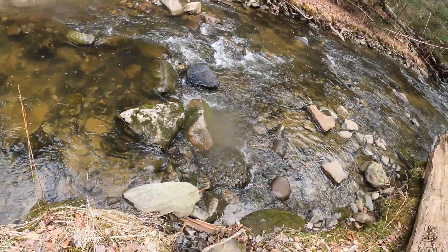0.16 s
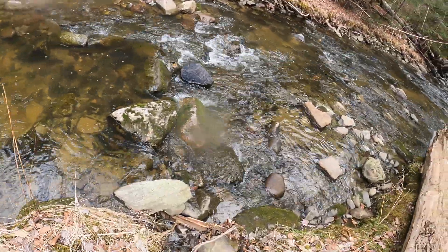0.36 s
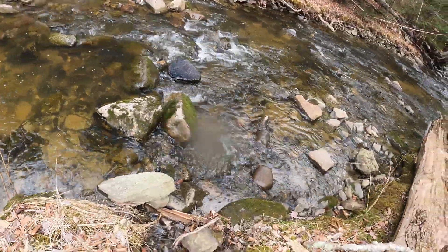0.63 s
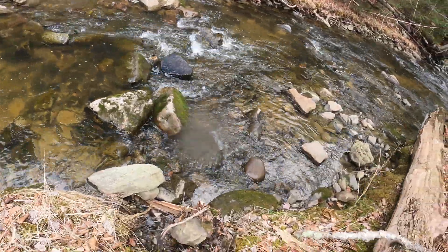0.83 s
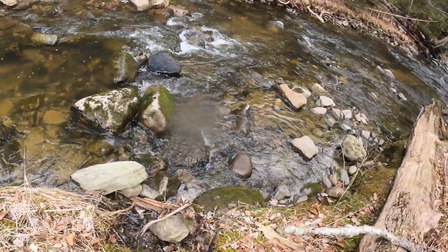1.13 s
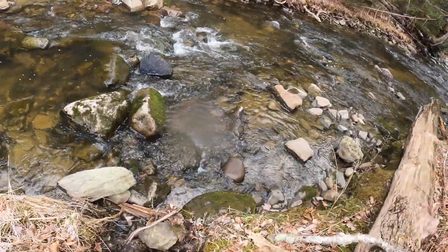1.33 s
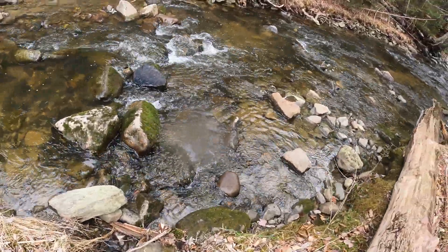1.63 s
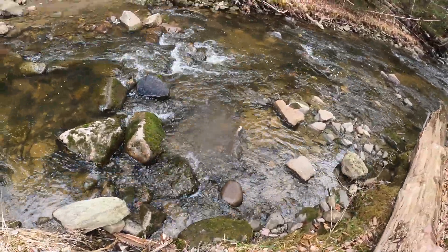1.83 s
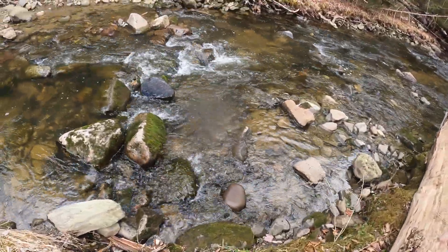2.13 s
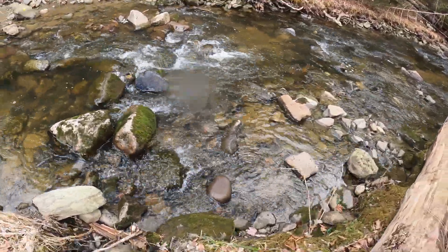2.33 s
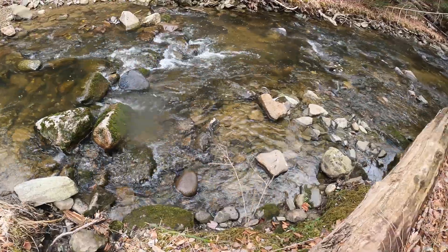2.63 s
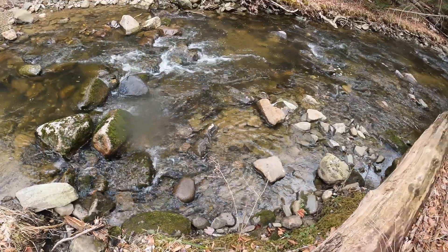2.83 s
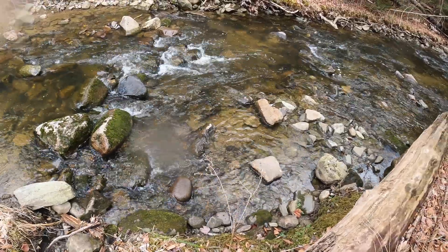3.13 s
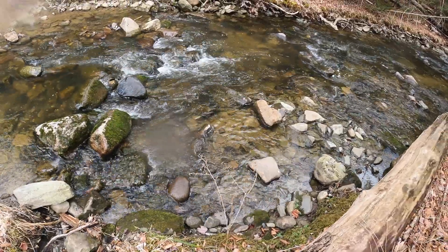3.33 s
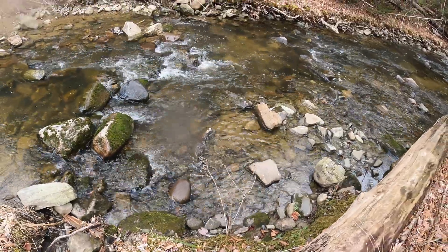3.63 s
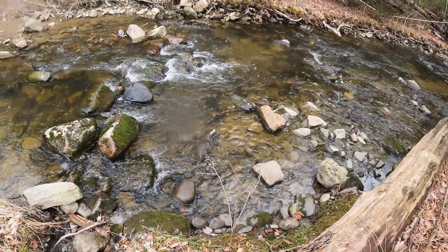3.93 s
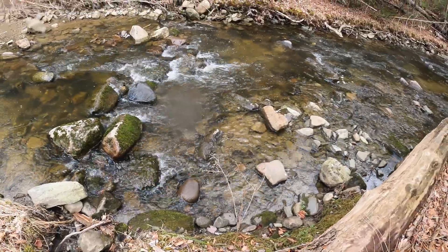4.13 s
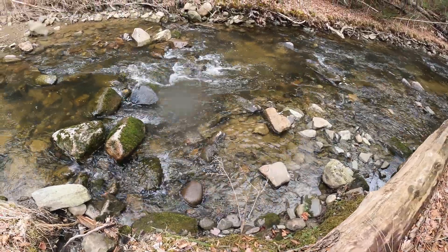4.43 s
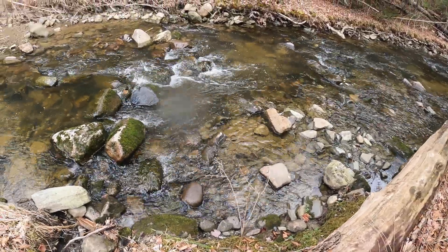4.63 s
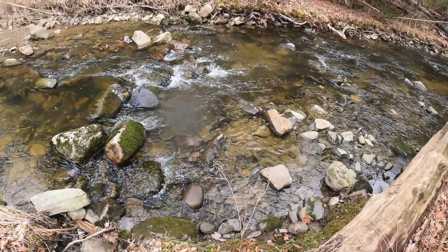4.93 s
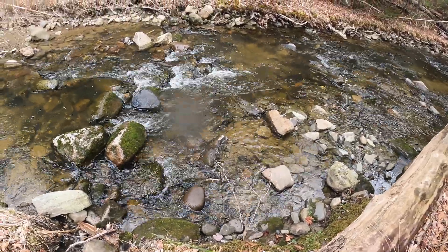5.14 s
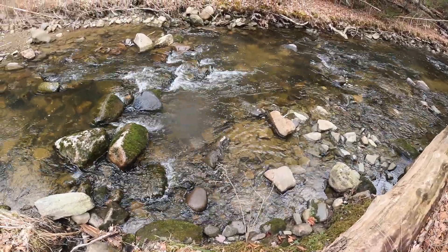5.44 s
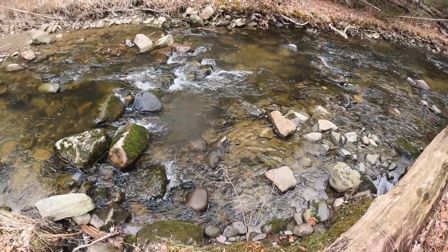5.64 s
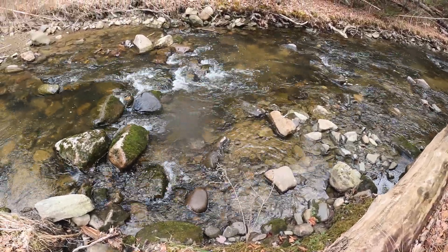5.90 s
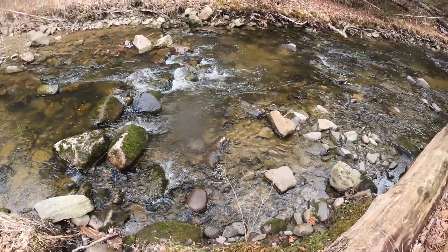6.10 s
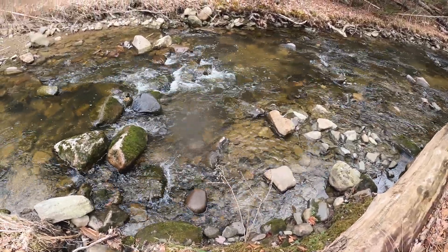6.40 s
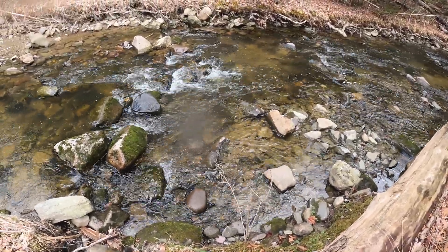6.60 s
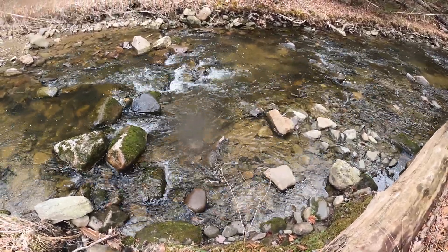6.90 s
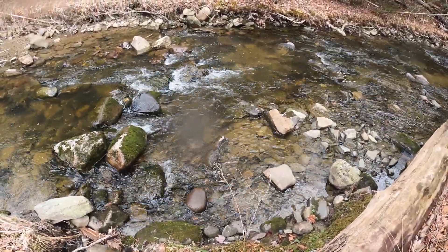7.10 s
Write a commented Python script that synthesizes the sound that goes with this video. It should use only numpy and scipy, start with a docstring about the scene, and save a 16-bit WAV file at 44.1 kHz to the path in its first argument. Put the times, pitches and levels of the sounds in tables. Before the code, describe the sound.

Outdoors beside a small stony brook, water rushes steadily a few metres away, a bright, fine, bubbly wash in wide stereo. Very close, a hand adjusts the camera: hard hollow clacks and boomy thumps cluster in the first second, then scatter until about 3.6 seconds, with dull squeaky finger rubs and low rumble. Afterwards soft bumps fade and the brook flows on with a few gurgles and tiny droplet ticks.

```python
"""Beside a shallow brook, a few metres from the stones: a steady wash of small bubbles and noise,
with larger gurgling bubbles that rise in pitch and bright ticks of noise: a dry snap, then a few droplets.
Mostly in the first four seconds a hand adjusts the camera. Blows ring the modes of its housing and swing
its mount, fingers rub and squeak as tiny uneven clicks, and a low filtered-noise rumble comes and goes."""
import sys
import numpy as np
from scipy import signal
from scipy.fft import rfft, irfft
from scipy.io import wavfile
from scipy.ndimage import uniform_filter1d

SR = 44100
rng = np.random.default_rng(int(sys.argv[2]) if len(sys.argv) > 2 else 0)


def generate_wav(sig):
    """Save sig (samples, or channels by samples) to the path in sys.argv[1] as 16-bit PCM at SR."""
    pcm = np.round(np.clip(np.atleast_2d(sig).T, -1, 1) * 32767).astype(np.int16)
    wavfile.write(sys.argv[1], SR, pcm)


N = 320166
TIME = np.arange(N) / SR  # s, whole scene
HIT_SIZE = 8192  # samples in a short sound
AGE = np.arange(HIT_SIZE) / SR  # s since a short sound began
SCUFF_S = 0.012  # the parts scuff this long before they meet
JERKY_DB = 2.2  # spread of the skin's changes of grip


# level of the brook, dipping around the loudest knocks and slowly coming back, before trim: start_s, level_db
BROOK_LEVEL = [(0.0, -54), (0.53, -51), (0.72, -61.5), (0.85, -54), (1.05, -59.5), (2.36, -54),
               (2.95, -55.5), (3.48, -51.5), (5.09, -50.5), (6.0, -50), (7.26, -50.5)]
# colour of rushing water: freq_hz, gain_db
WATER_COLOUR = [(120, 1.5), (200, -1), (300, -3.5), (510, -4), (630, -7.5), (760, -6.5), (950, -1),
                (1600, -4.5), (1830, -8), (2200, -4.5), (3200, -2), (5000, 1.5), (6100, 0.5), (7500, -12),
                (10000, -30.5), (13000, -42)]
# resonances of the two microphone ports: freq_hz, width_hz, left_db, right_db
PORT_RESONANCES = [(1420, 920, 11.5, 10), (2285, 875, 15.5, 7), (3833, 260, 9, 3), (4356, 670, 1.5, 9.5)]
# width of the water: freq_hz, left_right_likeness (correlation, 1 = the same on both sides)
WATER_LIKENESS = [(100, 0.61), (220, 0.72), (540, 0.36), (1300, 0.8), (2000, 0.031), (3100, 0.39),
                  (4300, 0.95), (7500, 0.9)]


def brook(trim_db=3.5):
    """The water is spread across the stream bed and coloured by each microphone port."""
    hz = np.fft.rfftfreq(N, 1 / SR)
    alike = np.clip(at_hz(WATER_LIKENESS, hz), -.99, .99)
    shared = np.sqrt(1 + alike) * rfft(water())
    opposed = np.sqrt(1 - alike) * rfft(water()) * [[1], [-1]]
    ports_db = 0
    for centre_hz, width_hz, left_db, right_db in PORT_RESONANCES:
        bump = np.exp(-(2 * (hz - centre_hz) / width_hz) ** 2)
        ports_db = ports_db + np.array([[left_db], [right_db]]) * bump
    at_ports = irfft((shared + opposed) * from_db(ports_db), N)
    level_db, = in_time(BROOK_LEVEL)
    return from_db(level_db + trim_db) * colour(at_ports, WATER_COLOUR)


def water(per_s=3600, dull_spread_db=3.0, bright_spread_db=6.5, cycles=18, wash_db=7.5, surge_db=1.0, count=24):
    """Countless small bubbles ring briefly over the wash: low ones blend evenly, the tiniest spit unevenly."""
    pitches = np.geomspace(380, 9000, count) * rng.uniform(.96, 1.04, count)
    spreads_db = np.interp(pitches, [1500, 5500], [dull_spread_db, bright_spread_db])
    bubbles = np.zeros(N)
    for hz, spread_db in zip(pitches, spreads_db):
        ringing = ring(grains(per_s / count, spread_db), hz, t60=cycles / hz)
        bubbles += np.sqrt(hz) * rms_one(np.diff(ringing, prepend=0))
    wash = rng.standard_normal(N) * from_db(surge_db * drift(40))
    return rms_one(bubbles) + from_db(wash_db) * wash


# large bubbles gulping near the bank: start_s, pitch_hz (before the rise), level_db
BANK_GULPS = [(5.85, 385, -48), (5.913, 457, -45), (6.19, 390, -47), (6.425, 790, -47)]


def gurgles(level_db=-56, count=260):
    """Larger bubbles come at random across the stream; a few near ones stand out."""
    out = np.zeros((2, N))
    for when, size, strength, place in rng.random((count, 4)):
        note = bubble(300 * 9 ** size)  # 300 to 2700 Hz
        note_db = level_db + 10 * (strength + size - 1)
        add(out, when * N / SR, from_db(note_db) * pan(12 * (place - .4)) * note)
    for s, hz, db in BANK_GULPS:
        add(out, s, from_db(db) * bubble(hz))
    return out


def bubble(hz, cycles=28, rise=0.46):
    """A bubble rings and rises in pitch as it reaches the surface."""
    life = AGE * hz / cycles  # 1 when it has fallen by 60 dB
    tone = np.sin(2 * np.pi * hz * AGE * (1 + rise * np.minimum(life, 1)))
    return tone * from_db(-60 * life) * (1 - np.exp(-AGE * hz))


# bright ticks: a dry snap like a twig at 0.12 s, then droplets by the stones: start_s, peak_db
BRIGHT_TICKS = [(0.1233, -33.5), (5.758, -38), (5.853, -39), (5.8835, -33), (6.204, -34), (6.44, -37.5),
                (6.5211, -40), (6.55, -40)]


def bright_ticks(t60=0.024, low_hz=4200, high_hz=7000):
    """Each tick is a short bright spatter of band-passed noise."""
    out = np.zeros((2, N))
    band = signal.butter(4, [low_hz, high_hz], "band", fs=SR, output="sos")
    for s, db in BRIGHT_TICKS:
        spatter = signal.sosfilt(band, rng.standard_normal(HIT_SIZE) * from_db(-60 * AGE / t60))
        add(out, s, from_db(db) * spatter / abs(spatter).max())
    return out


# knocks of the housing, levels before trim; where a blow lands sets how the mount swings:
# start_s, clack_db, hollow_body_db, thump_db, thump_hz, thump_t60_s, crack_db, contact_hardness_hz
HOUSING_KNOCKS = [(0.2829, -16, -20, -11.5, 131, 0.083, -26, 1900),
                  (0.3931, -15.5, -19, -10, 131.4, 0.095, -24, 1720),
                  (0.4917, -19, -14, -6.5, 105, 0.031, -26, 1970),
                  (0.5694, -26, -19, -20, 150, 0.12, -50, 1700),
                  (0.589, -13.5, -33, -26, 125, 0.045, -28, 1900),
                  (0.594, -18, -19.5, -9.5, 121, 0.06, -7.5, 2000),
                  (0.615, -10, -25, -11, 125.5, 0.082, -20, 1700),
                  (0.641, -9.5, -15, -6, 116, 0.038, -20, 1850),
                  (0.658, -9.5, -18.5, -8.5, 124, 0.061, -23.5, 1800),
                  (0.696, -31, -34, -18, 110, 0.046, -28, 1800),
                  (0.7275, -7.5, -18.5, -10, 126, 0.079, -22, 1900),
                  (0.839, -28, -28, -25, 125, 0.053, -28, 1800),
                  (0.8573, -8.5, -9.5, -8.5, 124.3, 0.067, -17, 1610),
                  (0.8766, -10.5, -15.5, -12.5, 117, 0.075, -19, 1510),
                  (0.8952, -9, -23, -16.5, 136.7, 0.13, -20, 1630),
                  (1.024, -17.5, -19, -17.5, 123, 0.11, -23, 1900),
                  (1.07, -25, -36, -25.5, 121.3, 0.16, -31.5, 1790),
                  (1.11, -39, -43, -42, 128, 0.06, -51, 1700),
                  (1.129, -27.5, -31.5, -23.5, 117, 0.11, -35.5, 1850),
                  (1.4215, -26, -32.5, -22.5, 120, 0.046, -38, 1710),
                  (1.4547, -29.5, -36, -16.5, 131.5, 0.064, -40, 1710),
                  (1.5537, -30.5, -35, -44, 113, 0.1, -38, 1750),
                  (1.5889, -17, -27.5, -17, 130, 0.076, -30, 1840),
                  (1.7394, -32, -27.5, -39, 141, 0.11, -52, 1700),
                  (1.7782, -25, -31, -31, 117, 0.05, -30.5, 1730),
                  (1.8412, -21.5, -32, -28.5, 112, 0.047, -30, 1900),
                  (1.864, -19.5, -29, -27.5, 139, 0.1, -27, 1850),
                  (1.891, -20, -30, -22.5, 134, 0.059, -29, 1850),
                  (1.9821, -15.5, -21.5, -20.5, 137.8, 0.14, -27.5, 1560),
                  (2.064, -48, -39, -36, 130, 0.067, -52, 1500), (2.1, -48, -45, -33, 129, 0.06, -55, 1500),
                  (2.195, -21.5, -11.5, -11, 116.4, 0.1, -18, 1950),
                  (2.201, -19, -38, -14.5, 125.4, 0.093, -32, 1800),
                  (2.2187, -27, -18, -24.5, 138, 0.089, -46, 1900),
                  (2.2239, -17.5, -34, -32, 137, 0.072, -43, 1790),
                  (2.256, -18, -16.5, -26, 130, 0.12, -40, 1870),
                  (2.3046, -11.5, -13.5, -6.5, 131, 0.058, -23, 1800),
                  (2.4994, -17.5, -17.5, -20, 144.5, 0.11, -23.5, 1980),
                  (2.5224, -14.5, -26, -18, 128.6, 0.16, -27, 1700),
                  (2.6313, -27.5, -26, -30.5, 119, 0.14, -56.5, 1400),
                  (2.6571, -21, -24.5, -22.5, 128, 0.058, -29, 1400),
                  (2.8232, -13, -21.5, -12.5, 127, 0.095, -41, 2120),
                  (2.902, -43, -40, -36, 128, 0.068, -55, 1700),
                  (2.953, -24, -35, -24.5, 128, 0.11, -51.5, 1700),
                  (3.5256, -26, -40, -27.5, 131, 0.092, -50, 1500),
                  (3.6134, -11, -15, -22, 143.5, 0.11, -39, 1850),
                  (3.6214, -22, -21, -26, 124, 0.065, -52, 1750),
                  (3.6324, -33, -14.5, -41, 114, 0.08, -49, 1750),
                  (3.638, -28, -27, -39, 144, 0.12, -46, 1770),
                  (4.078, -42, -54, -49, 130, 0.06, -62, 1490),
                  (4.313, -45, -40, -36, 130, 0.06, -58, 1500),
                  (4.467, -44, -41, -31.5, 178, 0.024, -55, 1500),
                  (6.488, -56, -54, -43.5, 150, 0.031, -55, 1500)]
# soft bumps of the hand, before trim: start_s, level_db
HAND_BUMPS = [(3.213, -32.5), (3.403, -25.5), (3.699, -32), (4.084, -25.5), (4.131, -28.5), (4.319, -22.5),
              (4.885, -43), (5.031, -39), (5.361, -52), (5.773, -46), (6.027, -45), (6.904, -46.5)]
# modes of the plastic housing, about: freq_hz, level_db, t60_s, left_over_right_db
HOUSING_MODES = [(326, -8, 0.01, 1), (455, -6.5, 0.023, 2), (587, -1, 0.014, 3), (952, -5.5, 0.023, 18.5),
                 (1095, 13, 0.014, 2.5), (1163, -16, 0.001, 6.5), (1420, -16, 0.025, 5)]
# stiff, heavily damped modes that a hard contact reaches, about: freq_hz, level_db, t60_s, left_over_right_db
CRACK_MODES = [(1680, 4.5, 0.011, 14), (2470, 2.5, 0.0059, 4), (3070, -3, 0.0098, 5.5), (3290, 3, 0.006, 6),
               (4200, 3, 0.0022, -12), (4730, -4, 0.0071, -4.5), (5100, -9.5, 0.004, -3.5),
               (5860, -19, 0.0043, -2)]


def knocks(clack_trim_db=1.0, thump_trim_db=9.5, bump_trim_db=7.5, give_s=0.000907, swing_lag_s=0.0024):
    """A blow clacks and booms in the housing, its gritty edge cracks, the mount swings; bumps only swing it."""
    out = np.zeros((2, N))
    body = [mode for mode in HOUSING_MODES if mode[0] < 800]  # Hz
    shell = [mode for mode in HOUSING_MODES if mode[0] >= 800]
    for s, clack_db, hollow_db, thump_db, thump_hz, thump_t60, crack_db, hardness_hz in HOUSING_KNOCKS:
        push = contact(grit=0.055, grit_s=0.0029, soft_hz=hardness_hz, scuff_db=-7.0)
        blow = np.diff(push, prepend=0)
        # the stronger the crack, the higher its edge reaches
        reach_hz = np.interp(crack_db, [-44, -30, -3], [3000, 5300, 6600])
        edge = contact(grit=0.13, grit_s=0.0033, soft_hz=reach_hz, scuff_db=-14.0)
        scuff_start = s + give_s - SCUFF_S
        add(out, scuff_start, from_db(clack_db + clack_trim_db) * housing(shell, blow))
        add(out, scuff_start, from_db(hollow_db) * housing(body, blow))
        add(out, scuff_start, from_db(crack_db) * housing(CRACK_MODES, edge))
        swing_gain = from_db(thump_db + thump_trim_db)
        add(out, s + swing_lag_s, swing_gain * pan(0.5) * thump(thump_hz, thump_t60, rise_s=0.0065))
        add(out, s, swing_gain * lurch())
    for s, db in HAND_BUMPS:
        add(out, s, from_db(db + bump_trim_db) * thump(hz=128, t60=0.1, rise_s=0.007))
    return out


def contact(grit, grit_s, soft_hz, scuff_db, before_s=0.0035, after_s=0.0071, side_db=-11):
    """The parts scuff, meet in one gritty blow and scuff on, all rounded by the give of the plastic."""
    t = AGE[:HIT_SIZE // 3] - SCUFF_S  # 0 when the parts meet
    scuff = from_db(scuff_db) * np.exp(-np.maximum(-t / before_s, t / after_s))
    pressure = (t >= 0) * np.exp(-(t / grit_s) ** 2) + scuff
    force = grit * pressure * stereo(*rng.standard_normal((2, len(t))), side_db)
    force[:, round(SCUFF_S * SR)] += 1  # the blow itself
    return low_pass(force + 1e-18, soft_hz, order=6)


def housing(modes, force):
    """A contact sets all modes off together, each varied a little at random by where it lands; peak 1."""
    out = 0
    for hz, db, t60, side_db in modes:
        strength, lean_db, detune = rng.standard_normal(3)
        mode = ring(force, hz * (1 + .012 * detune), t60)
        out = out + from_db(db + 1.5 * strength) * pan(side_db + lean_db) * mode
    return out / abs(out).max()


# side modes of the mount swinging after a blow: freq_hz, middle_level_db (varied at random), t60_s
MOUNT_SWING = [(92, -12, 0.056), (126, -27, 0.042)]


def thump(hz, t60, rise_s):
    """The camera swings on its mount, each side mode at a new strength every time."""
    swing = np.sin(2 * np.pi * hz * AGE) * from_db(-60 * AGE / t60)
    for mode_hz, db, mode_t60 in MOUNT_SWING:
        decay = from_db(db + rng.normal(0, 6.2) - 60 * AGE / mode_t60)
        swing = swing + np.sin(2 * np.pi * mode_hz * AGE) * decay
    return -swing * (1 - np.exp(-(AGE / rise_s) ** 2))


def lurch(middle_hz=68, t60=0.099, level_db=-15.5):
    """A blow also rocks the whole camera, slowly, until it settles; level against the thump."""
    hz = middle_hz * np.exp(rng.normal(0, 0.19))
    return -np.sin(2 * np.pi * hz * AGE) * from_db(level_db - 60 * AGE / t60)


# dense crunch where the housing snaps hardest: start_s, level_db, length_s
SNAPS = [(0.5944, -4.5, 0.0058), (0.6139, -14, 0.005)]
# colour of a crunch: freq_hz, gain_db
CRUNCH_COLOUR = [(900, -13), (1900, 5), (2600, -3.5), (3400, -6), (4200, 7.5), (5200, 8.5), (6400, -6),
                 (7800, -26), (10000, -43), (13000, -45)]


def crunches():
    """The plastic catches and gives way in a few milliseconds of dense grit."""
    out = np.zeros((2, N))
    for s, db, length_s in SNAPS:
        grit = colour(stereo(*rng.standard_normal((2, HIT_SIZE)), side_db=-12), CRUNCH_COLOUR)
        onset = 1 - np.exp(-(AGE / .0004) ** 2)
        burst = grit * onset * np.exp(-(AGE / length_s) ** 2)
        add(out, s, from_db(db) * pan(-3.0) * burst / abs(burst).max())
    return out


# fingers sliding on the case: start_s, end_s, mid_stroke_level_db, swell_db (from start to end)
FINGER_RUBS = [(0.736, 0.863, -43, 10), (0.896, 1.014, -43.5, 7), (1.247, 1.321, -48.5, 8),
               (1.303, 1.405, -47, -9), (1.436, 1.588, -48.5, -6), (1.617, 1.753, -49, 3),
               (2.304, 2.405, -45.5, -5), (2.405, 2.459, -46, -3), (2.814, 2.93, -49, -20),
               (2.946, 3.035, -45.5, -3), (3.013, 3.109, -46.5, 6), (3.093, 3.208, -49.5, -2),
               (3.198, 3.265, -44, -5), (3.281, 3.55, -42.5, 3.5), (3.536, 3.607, -45, -16),
               (3.623, 3.704, -40, -4), (3.838, 3.91, -55.5, 6)]
# colour of skin rubbing on the case: freq_hz, gain_db
RUB_COLOUR = [(150, 2.5), (300, 2.5), (470, 4), (620, 6), (780, -2), (900, 3), (1120, 4.5), (1350, -3),
              (1600, 4), (1900, -23.5), (2400, -17.5), (3200, -28.5), (6000, -49.5)]
# quick slips of skin: start_s, end_s, level_db, hiss_db (against the dull rub)
SKIN_SLIPS = [(0.513, 0.551, -34.5, -4), (0.643, 0.732, -34.5, -12), (0.882, 1.0, -44, 0.5),
              (2.24, 2.301, -36, -21), (3.681, 3.715, -33.5, -26)]
# colour of the hiss of a quick slip: freq_hz, gain_db
SLIP_COLOUR = [(1000, -8), (2400, 9), (3500, 1), (5300, 2.5), (6400, -8.5), (8000, -39.5), (12000, -75.5)]


def fingers(uneven_db=1.0, squeak_db=-3.5, crackle_db=-24.5):
    """Skin catches and slips on the case in uneven tiny jerks, squeaks and crackles; fast slips also hiss."""
    catches, far_side = (grains(per_s=1500, spread_db=1.5) for _ in range(2))
    grip = from_db(uneven_db * drift(25) + JERKY_DB * drift(65))
    friction = stereo(catches, far_side, side_db=-12.0) * grip
    rub = colour(friction, RUB_COLOUR)
    rub = rms_one(rub + from_db(squeak_db) * squeak(rub)) * pan(1.0)
    crackle = rms_one(housing(CRACK_MODES, grains(per_s=240, spread_db=0.5)))
    rub = rub + from_db(crackle_db) * crackle
    grit = stereo(*rng.standard_normal((2, N)), side_db=-6.5) * from_db(JERKY_DB * drift(120))
    hiss = colour(grit, SLIP_COLOUR)
    out = rub * sum(stroke(*row) for row in FINGER_RUBS)
    for start, end, db, hiss_db in SKIN_SLIPS:
        slip = gate(start, end, edge_s=(end - start) / 3)
        out += from_db(db) * slip * (rub + from_db(hiss_db) * hiss)
    return out


# the squeak of the skin moves as the finger rolls over the case: start_s, resonance_hz
SQUEAK_PATH = [(2.96, 1233), (3.1, 1110), (3.23, 1270), (3.3, 1374), (3.35, 1420), (3.41, 1350),
               (3.47, 1053), (3.53, 1136), (3.6, 1156), (3.7, 1420)]


def squeak(x, width_hz=260, size=128):
    """Friction through the moving resonance of the fingertip; rms 1."""
    centre_hz, = in_time(SQUEAK_PATH)
    r = np.exp(-np.pi * width_hz / SR)
    out, state = np.zeros_like(x), np.zeros((2, 2))
    for i in range(0, N, size):  # the resonance moves on every block, its ringing carries over
        poles = [1, -2 * r * np.cos(2 * np.pi * centre_hz[i] / SR), r * r]
        out[:, i:i + size], state = signal.lfilter([1, 0, -1], poles, x[:, i:i + size], zi=state)
    return rms_one(out)


def stroke(start, end, db, swell_db):
    """A finger takes hold, presses steadily harder or softer with a slight waver, and lets go."""
    swell = swell_db * np.interp(TIME, [start, end], [-.5, .5])
    return gate(start, end, edge_s=0.017) * from_db(1.66 * drift(4.3) + db + swell)


def gate(start, end, edge_s):
    """1 during a stroke, with short ramps at both ends."""
    return np.clip(np.minimum(TIME - start, end - TIME) / edge_s, 0, 1)


# a dragging finger keeps the mount shuddering: start_s, end_s, mid_stroke_level_db, swell_db (start to end)
DRAGS = [(0.786, 0.866, -25, 12), (0.931, 1.031, -26.5, -8)]


def shudder(middle_hz=132.2, waver=0.045):
    """Stick and slip feed the mount near its own pitch, so it keeps swinging."""
    hz = middle_hz * (1 + waver * drift(17.4))
    return np.sin(2 * np.pi * np.cumsum(hz) / SR) * sum(stroke(*row) for row in DRAGS)


# the hand jerks the camera without a knock: start_s, level_db
HAND_JERKS = [(2.357, -25.5), (2.585, -26), (3.547, -19), (3.914, -35), (3.993, -24)]


def jerks(rock_hz=36.3, length_s=0.058):
    """A jerk of the hand rocks the camera smoothly to and fro, too slowly to ring the mount."""
    out = np.zeros((2, N))
    swell = np.sin(np.pi * np.minimum(AGE / length_s, 1))
    rock = -np.sin(2 * np.pi * rock_hz * AGE) * swell
    for s, db in HAND_JERKS:
        add(out, s, from_db(db) * rock)
    return out


# grip of the hand, restless at first and then settling, before trim: start_s, rumble_db, mount_hum_db
HAND_GRIP = [(0.0, -39.5, -57), (0.25, -37, -56.5), (0.45, -34.5, -30), (0.68, -21, -31), (0.8, -37, -57),
             (1.1, -34.5, -32.5), (1.7, -43, -47.5), (1.95, -34, -39), (2.2, -40.5, -45),
             (2.55, -30.5, -38.5), (2.8, -31, -58.5), (3.02, -35.5, -38), (3.5, -32.5, -48),
             (3.8, -33, -49.5), (4.05, -28, -53.5), (4.65, -38, -61), (5.9, -41.5, -64.5),
             (7.26, -46, -74.5)]
# colour of the rumble of the unsteady hand: freq_hz, gain_db
RUMBLE_COLOUR = [(12, -4.5), (22, 1.5), (36, -3), (52, -8.5), (75, -23), (110, -30), (250, -54)]
# colour of the hum of the mount: freq_hz, gain_db
HUM_COLOUR = [(50, -25), (85, 1.5), (125, 7.5), (150, 7.5), (190, -14.5), (300, -24.5), (600, -21.5)]


def shake(rumble_trim_db=-2.5, even_s=0.12, tremble_db=3.0, tremble_hz=4):
    """The unsteady hand rumbles through the body and keeps the mount humming."""
    rumble_db, hum_db = in_time(HAND_GRIP)
    rumble = colour(rng.standard_normal(N), RUMBLE_COLOUR)
    # even out the rumble by its own short-term level
    rumble /= np.sqrt(uniform_filter1d(rumble ** 2, int(even_s * SR)) + 0.078)
    hum = colour(rng.standard_normal(N), HUM_COLOUR)
    tremble = from_db(tremble_db * drift(tremble_hz))
    return tremble * (from_db(rumble_db + rumble_trim_db) * rumble + from_db(hum_db) * hum)


def from_db(db):
    """Decibels to gain."""
    return 10 ** (np.asarray(db) / 20)


def rms_one(x):
    """Scale to rms 1."""
    return x / np.sqrt(np.mean(x ** 2) + 1e-20)


def in_time(rows):
    """Each column of a curve at every sample."""
    s, *columns = np.transpose(rows)
    return [np.interp(TIME, s, c) for c in columns]


def at_hz(points, hz):
    """A spectrum read on a log-frequency axis."""
    points = np.array(points)
    return np.interp(np.log(np.maximum(hz, 1)), np.log(points[:, 0]), points[:, 1])


def colour(x, spectrum):
    """Filter by a spectrum that falls off further beyond its ends; rms 1."""
    hz = np.fft.rfftfreq(x.shape[-1], 1 / SR)
    low_skirt = np.clip(hz / spectrum[0][0], 0, 1)
    high_skirt = np.clip(spectrum[-1][0] / (hz + 1), 0, 1)
    gain = from_db(at_hz(spectrum, hz)) * (low_skirt * high_skirt) ** 2
    return rms_one(irfft(rfft(x) * gain, x.shape[-1]))


def low_pass(x, hz, order):
    """Causal Butterworth low-pass."""
    return signal.sosfilt(signal.butter(order, min(hz, .45 * SR), fs=SR, output="sos"), x)


def drift(rate):
    """Slow chance with rms 1: smoothed noise drawn every 40 samples; rate in Hz."""
    r = np.exp(-80 * np.pi * rate / SR)
    noise = rng.standard_normal(N // 40 + 2002)
    slow = signal.lfilter([1], [1, -2 * r, r * r], noise)[2000:]  # skip the settling
    return np.interp(np.arange(N) / 40, np.arange(len(slow)), rms_one(slow))


def grains(per_s, spread_db):
    """Random clicks of uneven size and either sign."""
    chance = rng.random(N) * SR / per_s
    born = np.flatnonzero(chance < 1)
    out = np.zeros(N)
    size_db = spread_db * np.minimum(-np.log(chance[born]), 5)
    out[born] = from_db(size_db) * (-1.0) ** born
    return out


def ring(clicks, hz, t60):
    """A unit click sets a decaying sine of starting height 1 ringing."""
    r, w = from_db(-60 / (t60 * SR)), 2 * np.pi * hz / SR
    return signal.lfilter([0, np.sin(w)], [1, -2 * r * np.cos(w), r * r], clicks + 1e-18)


def pan(db):
    """Left and right gains for a level difference, left over right."""
    return from_db(np.array([[db], [-db]]) / 2)


def stereo(mid, side, side_db):
    """Two channels from a shared part and a weaker opposed part."""
    return mid + from_db(side_db) * side * np.array([[1], [-1]])


def add(out, s, sound):
    """Mix a short sound in at a time."""
    i = max(round(s * SR), 0)
    out[:, i:i + sound.shape[-1]] += sound[..., :N - i]


def scene():
    """Water and bright ticks in front, handling noise straight through the body."""
    outdoors = brook() + gurgles() + bright_ticks()
    handling = knocks() + crunches() + fingers() + shudder() + jerks() + shake()
    return outdoors + handling


def record(dry):
    """The top is cut, 70 dB down from 14 kHz."""
    return signal.sosfilt(signal.cheby2(12, 70, 14000, fs=SR, output="sos"), dry)


dry = scene()
out = record(dry)
generate_wav(out)
```